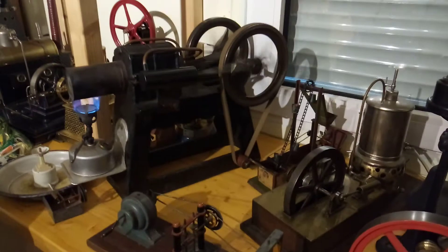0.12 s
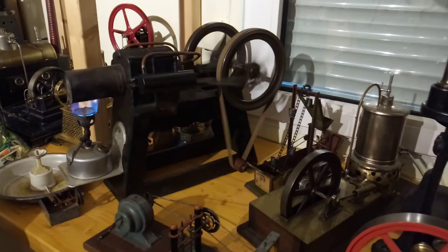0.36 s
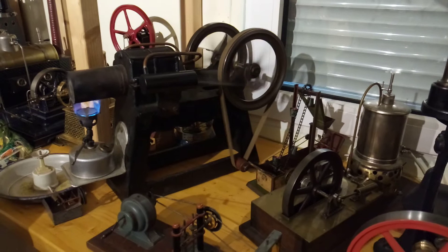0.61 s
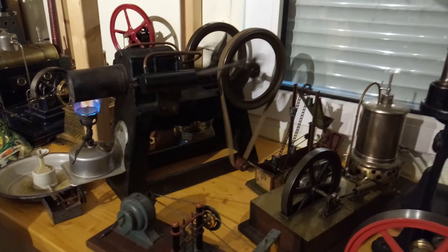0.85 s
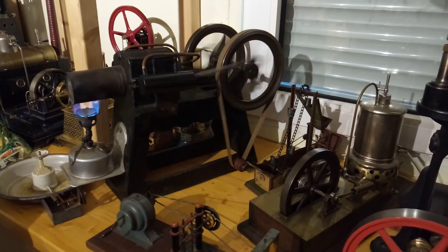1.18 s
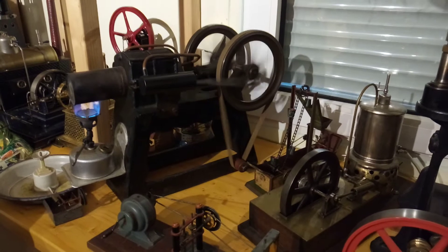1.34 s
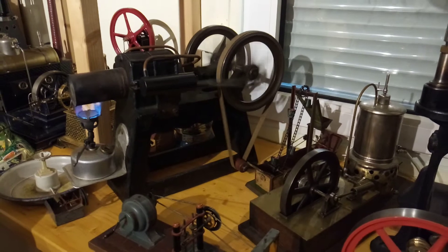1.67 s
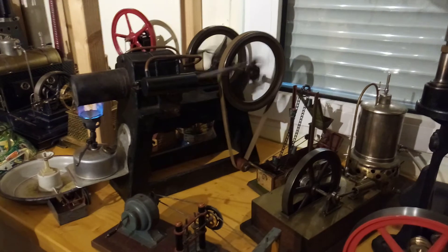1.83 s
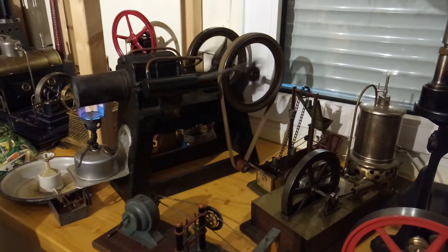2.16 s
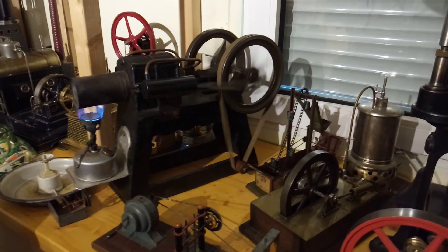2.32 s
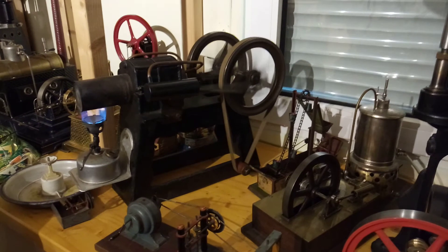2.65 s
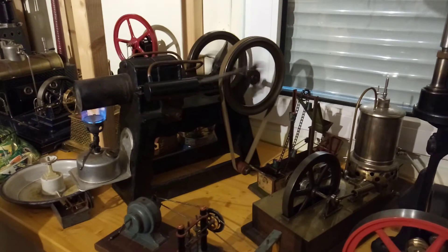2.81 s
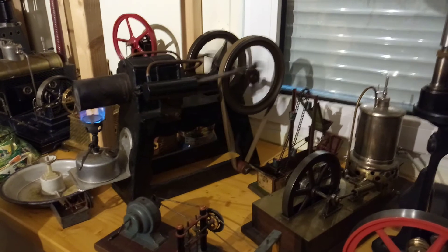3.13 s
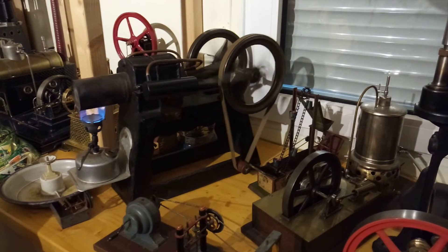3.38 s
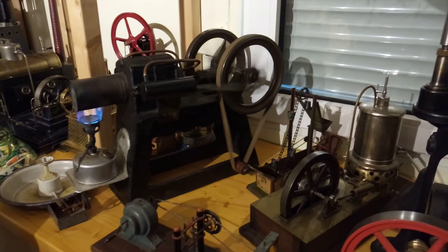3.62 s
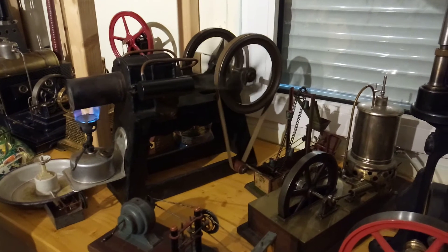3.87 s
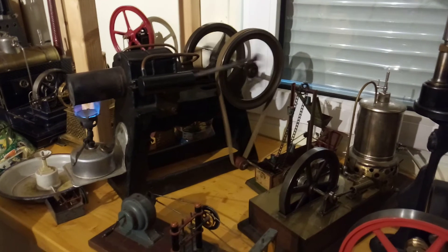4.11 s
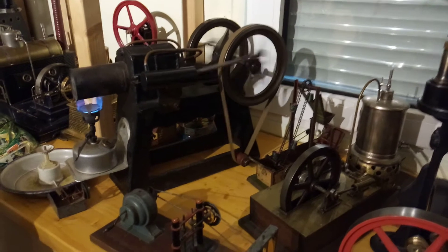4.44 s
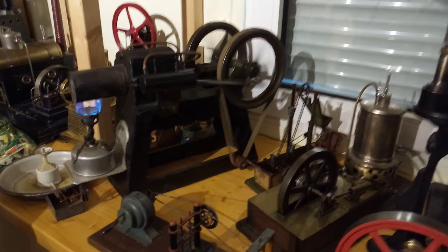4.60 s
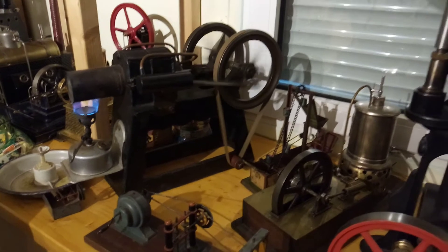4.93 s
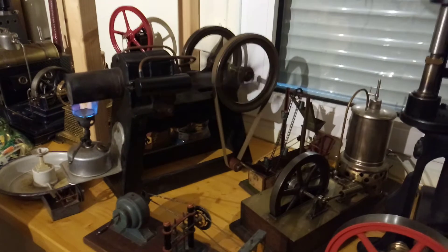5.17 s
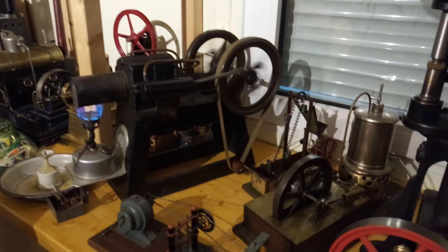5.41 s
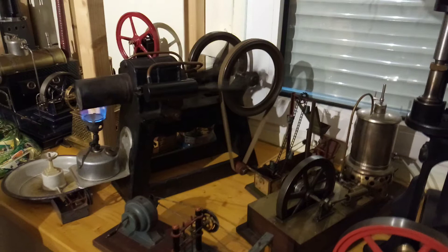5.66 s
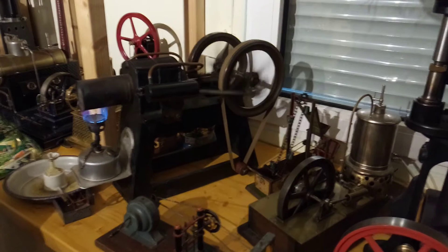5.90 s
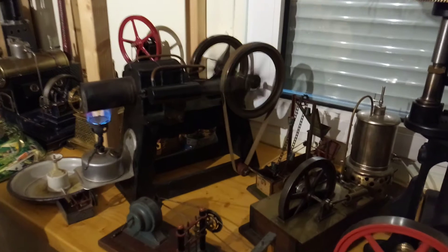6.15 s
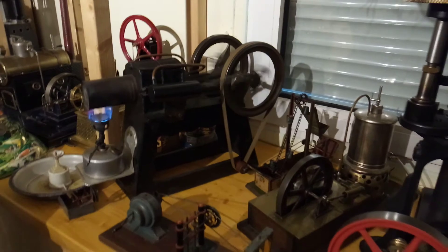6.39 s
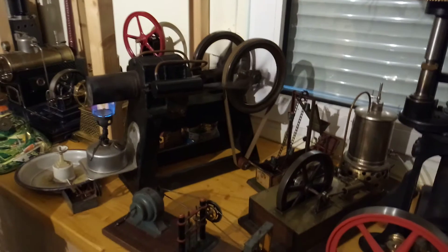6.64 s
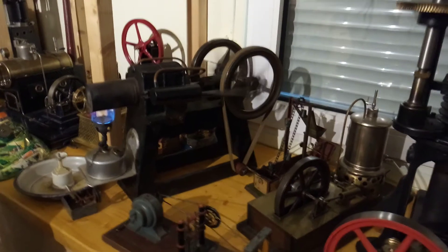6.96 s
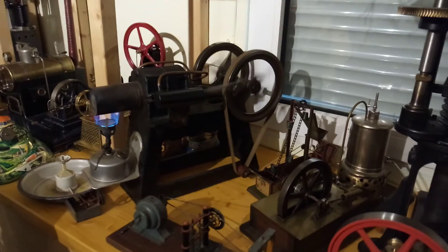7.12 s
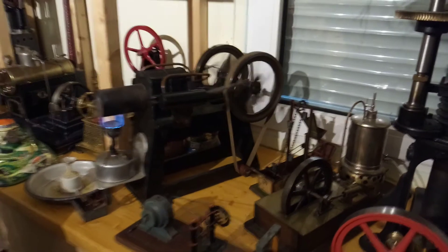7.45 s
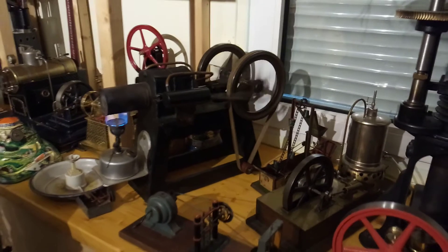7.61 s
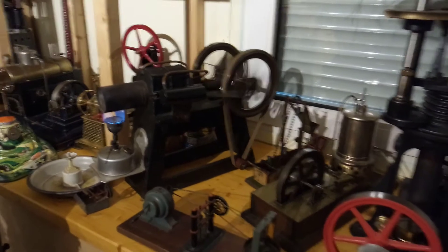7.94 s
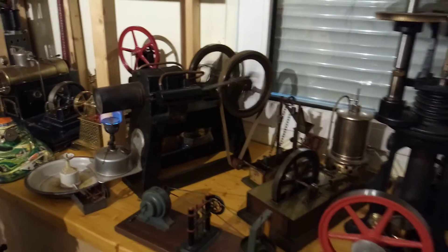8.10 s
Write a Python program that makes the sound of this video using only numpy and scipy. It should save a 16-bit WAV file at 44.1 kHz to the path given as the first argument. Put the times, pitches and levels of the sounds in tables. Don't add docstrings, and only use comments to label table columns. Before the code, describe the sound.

Steady mechanical clinking from an old flame-heated engine, already running and never stopping. High metallic strikes alternate with a looser cluster of knock, ping, tick and rattle, varying from turn to turn, with faint low thumps through floor and bench. A soft, fluttering burner roar fills the gaps. Near, bright microphone indoors, short room echo; late on there is a double slip, a dull handling tap, then the clink softens slightly.

```python
import sys
import numpy as np
from scipy import signal
from scipy.fft import rfft, irfft
from scipy.io import wavfile

SR = 44100
rng = np.random.default_rng(int(sys.argv[2]) if len(sys.argv) > 2 else 0)


def int16_out(signal):
    q = np.round(np.clip(np.atleast_2d(signal).T, -1, 1) * 32767)
    wavfile.write(sys.argv[1], SR, q.astype(np.int16))


def voltage_ratio(decibels):
    exponent = np.asarray(decibels, float) / 20
    return 10 ** exponent


N = 364707
LEAD = SR // 2

# start_s, return_knock_db, tick_db
TURNS = [(0.0563, -32.5, -26), (0.3802, -34, -23), (0.7051, -28.5, -21.5), (1.0287, -39.5, -23),
         (1.3535, -33.5, -26), (1.6793, -30.5, -25), (2.005, -33.5, -23), (2.3319, -29.5, -24),
         (2.6591, -28.5, -24.5), (2.9867, -24, -29), (3.315, -28, -25), (3.6434, -38.5, -26),
         (3.9723, -29, -27), (4.301, -39, -23), (4.6318, -29, -19.5), (4.9627, -21, -32.5),
         (5.2946, -23, -22.5), (5.6262, -24.5, -20), (5.9592, -21, -24), (6.2916, -24.5, -25.5),
         (6.6246, -24, -30.5), (6.9589, -19.5, -28.5), (7.293, -33.5, -23.5), (7.6266, -29.5, -29.5),
         (7.9607, -25, -28)]

# frequency_hz, density_db (per Hz)
FLAME = [(30, -41), (60, -28), (100, -15.5), (160, -4), (247, -1.5), (491, -4), (975, -3), (1530, -7),
         (1900, -4), (3030, -10), (6020, -16.5), (7000, -21.5), (8000, -41), (12500, -50)]
# frequency_hz, width_hz, level_db
BURNER = [(362, 25, -4), (1000, 40, -3), (1125, 40, -4), (875, 40, -7), (5604, 14, -3), (715, 40, -8)]

# frequency_hz, level_db, t60_s, build_up_ms
ROD = [(3486, -1.5, .05, .5), (3454, -13, .3, .5), (3475, -5, .13, .5), (3553, -13, .07, .5),
       (3408, -17, .12, .5), (3341, -12, .04, .5)]
BEAM_PAIRS = [(2048, 1, .21, 9), (2062, -5.5, .3, 9), (2021, -3, .13, .6), (1888, -4.5, .42, 18),
              (1875, -7.5, .3, 18)]
FLOORBOARD = [(71, 1, .21, 14), (56, -8, .17, 14), (82, -8, .14, 14)]
BEAM = [(1829, -9.5, 0.18, .6), (1927, -4, 0.043, 0.88), (2144, -6, 0.096, 0.44), (2354, -2.5, 0.068, 0.63),
        (2473, -8, 0.21, 2.8), (2543, -3.5, 0.086, 0.63), (2685, -12, 0.17, .6), (2717, -1.5, 0.07, 0.53),
        (2890, -6, 0.056, 0.98), (3130, -7.5, 0.082, 0.4), (3606, -6, .1, .6), (3773, -9, .14, .6),
        (3928, -3, .07, .6), (4195, -14, .22, .6), (4660, -22.5, 0.066, .6), (5300, -11.5, 0.04, 0.76),
        (1430, -23.5, 0.054, .6)]
LATCH = [(6200, -4, .03, .5), (5850, -6, .04, .5), (4400, -5, .04, .5), (12670, -38, .03, .8),
         (14700, -42, .03, .8)]
BENCH = [(245, 0, .16, 3), (292, -5, .1, 3), (362, -7, .14, 3), (432, -11, .1, 3), (175, -11, .1, 5),
         (600, -11, .1, 2.5), (760, -12, .1, 2.5)]
CRANK = [(1824, -1.5, .09, .4), (2007, -6, .07, .4), (2142, -8, .06, .4), (3472, -3, .08, .4),
         (3919, -11, .06, .4), (1448, -12, .07, .6), (893, -17, .12, .8), (2551, -12, .06, .4),
         (5604, -19, .15, 1.5), (8963, -33, .04, .4), (14700, -42, .04, .4)]
LEVER = [(2366, -2.5, 0.04, 2.5), (2435, -7, 0.098, 8.3), (2786, -13.5, 0.06, 0.51),
         (1310, -14.5, 0.065, 5.5)]
PIN = [(3960, -11, 0.15, .4), (3570, -5.5, 0.055, .4), (4210, -3.5, 0.03, .4), (6800, -22, 0.03, .4)]

# turn_share (0 to 1), level_db
THUMPS = [
    (0.1, -41),
    (.575, -40),
    (.735, -45),
    (0.27, -52),
]
# turn_share (0 to 1), level_db (over its column), part (modes),
# column (index in crank_turns() rows; None = always alike)
CONTACTS = [
    (0.048, -34, LATCH, None),
    (0.058, -40.5, BENCH, None),
    (.502, 2, CRANK, 2),
    (.578, -3, PIN, 4),
    (.505, -32.5, BENCH, None),
    (.56, -34.5, BENCH, None),
    (.64, -35, BENCH, None),
    (.7, -42, BENCH, None),
    (.15, -44, BENCH, None),
]
# start_s, level_db
STRAY = [
    (6.021, -29),
    (6.027, -28.5),
    (0.87, -40),
    (2.1, -40),
]
# frequency_hz, density_db (per Hz)
RATTLE = [(180, -35.5), (300, -6), (978, -5), (1300, -3), (1580, -2), (2440, -9), (2700, -4), (3890, -3),
          (5610, -5), (7200, -14.5), (7820, -20), (8940, -36), (16000, -45)]
# frequency_hz, width_hz, level_db
LOOSE = [(1280, 120, -5), (2535, 110, -1), (3060, 520, -8.5), (3330, 250, -5), (3870, 88, -0.5),
         (4860, 190, -8), (5500, 25, -12), (6110, 230, -4.5), (895, 82, -2.5), (6890, 170, -8),
         (408, 39, -8)]
# frequency_hz, width_hz, level_db
CAPSULE = [(9020, 1040, 9), (12200, 1100, -4.5)]


def at_hz(points, hz):
    corner_hz, corner_db = np.array(points)[:, 0], np.array(points)[:, 1]
    return np.interp(np.log(hz + 1), np.log(corner_hz), corner_db)


def rms_one(x):
    return x / np.sqrt(np.mean(x ** 2) + 1e-20)


def colour(x, spectrum, peaks):
    hz = np.fft.rfftfreq(8192, 1 / SR)
    lift = 1 + sum(voltage_ratio(db + 9.5) ** 2 / (1 + (2 * (hz - at) / width) ** 2) for at, width, db in peaks)
    cepstrum = irfft(np.log(voltage_ratio(at_hz(spectrum, hz)) * np.sqrt(lift)))
    cepstrum[1:4096] *= 2
    cepstrum[4097:] = 0
    response = rms_one(irfft(np.exp(rfft(cepstrum)))) / np.sqrt(8192)
    return signal.oaconvolve(x, response)[:len(x)]


def clicks(times_s, gains):
    train = np.zeros(N + LEAD)
    at = (np.asarray(times_s) * SR + LEAD).astype(int)
    inside = at < N + LEAD
    np.add.at(train, at[inside], np.asarray(gains)[inside])
    return train


def strike(modes, times_s, level_db, uneven):
    t = np.arange(SR // 2) / SR
    hz, db, t60_s, rise_ms = np.transpose(modes)[:, :, None]
    envelope = voltage_ratio(db - 60 * t / t60_s) * (1 - np.exp(-1000 * t / rise_ms))
    rings = envelope * np.sin(2 * np.pi * hz * t)
    same = (-1) ** np.arange(len(modes))
    blows = (same + uneven * rng.standard_normal((len(times_s), len(modes)))) @ rings
    out = np.zeros(N + LEAD + SR)
    starts = (np.asarray(times_s) * SR + LEAD).astype(int)
    for at, gain, blow in zip(starts, voltage_ratio(level_db), blows):
        out[at:at + len(blow)] += gain * blow
    return out[:N + LEAD]


def slower_ms(length_s):
    return 1000 * length_s - 328.4


def crank_turns():
    rows = np.array([TURNS[0]] + TURNS)
    rows[0, 0] = 2 * rows[1, 0] - rows[2, 0]
    start_s, knock_db, tick_db = rows.T
    length_s = np.diff(start_s)
    length_s = np.append(length_s, length_s[-1])
    clink_db = -16 - 0.06 * slower_ms(length_s)
    ping_db = -21.3 + 0.13 * (knock_db + 28)
    rattle_db = -25.5 - 0.68 * (tick_db + 25)
    return np.transpose([start_s, clink_db, knock_db, ping_db, tick_db, rattle_db]), length_s


def flame():
    t = np.arange(N) / SR
    flutter = np.interp(t * 25, np.arange(N // 1000), rng.standard_normal(N // 1000))
    roar = colour(rng.standard_normal(N + LEAD), FLAME, BURNER)[LEAD:]
    rows, length_s = crank_turns()
    turn_edges_s = np.append(rows[:, 0], rows[-1, 0] + length_s[-1])
    crank = np.interp(t, turn_edges_s, np.arange(len(rows) + 1))
    draught_db = 0.5 * np.cos(2 * np.pi * (crank - 1))
    return roar * voltage_ratio(-42 + draught_db + 2.24 * flutter)


def rod_clink():
    rows, _ = crank_turns()
    hidden_db = 7 * np.clip(rows[:, 0] - 7.16, 0, None)
    return strike(ROD, rows[:, 0] + 0.00055, rows[:, 1] + 2.2 - hidden_db, uneven=0.045)


def beam_beating():
    rows, length_s = crank_turns()
    at_centre = rows[:, 0] + .0008
    beam_db = rng.normal(-27, .7, len(rows))
    out = strike(BEAM_PAIRS[:3], at_centre, beam_db, uneven=.2)
    low_db = 1.0 + beam_db - .5 * slower_ms(length_s)
    return out + strike(BEAM_PAIRS[3:], at_centre, low_db, uneven=.15)


def beam_ring():
    rows, _ = crank_turns()
    return strike(BEAM, rows[:, 0] + .0008, rng.normal(-26, 0.62, len(rows)), uneven=0.22)


def linkage_contacts():
    rows, length_s = crank_turns()
    out = np.zeros(N + LEAD)
    for share, db, part, column in CONTACTS:
        level_db = db + (rows[:, column] if column else rng.normal(0, .8, len(rows)))
        out += strike(part, rows[:, 0] + share * length_s, level_db, uneven=0.23)
    return out


def piston_thumps():
    rows, length_s = crank_turns()
    out = np.zeros(N + LEAD)
    for share, db in THUMPS:
        level_db = db + rng.normal(0, .8, len(rows))
        out += strike(FLOORBOARD, rows[:, 0] + share * length_s, level_db, uneven=0.22)
    return out


def lever_ping():
    rows, length_s = crank_turns()
    held = .0011 * np.clip(rows[:, 2] + 34, 0, 12)
    return strike(LEVER, rows[:, 0] + (.541 + held) * length_s, rows[:, 3] + 4, uneven=0.16)


def rattle():
    rows, length_s = crank_turns()
    start_s, clink_db, knock_db, _, tick_db, rattle_db = rows.T
    stray_s, stray_db = np.transpose(STRAY)
    t = np.arange(SR // 4) / SR
    burst = np.clip(t / 0.0021, 0, 1)
    shape = burst * voltage_ratio(-60 * np.clip(t - 0.0064, 0, None) / 0.077)

    trail = clicks(start_s + 0.0056 * length_s, voltage_ratio(clink_db - 18))
    trail += clicks(start_s + 0.041 * length_s, voltage_ratio(clink_db - 15.5))
    starts = clicks(start_s + .503 * length_s, voltage_ratio(knock_db - 6.5))
    starts += clicks(start_s + 0.573 * length_s, voltage_ratio(tick_db - 4))
    starts += clicks(start_s + .603 * length_s, voltage_ratio(rattle_db - 2.5))
    starts += clicks(stray_s, voltage_ratio(stray_db - 9.5))

    touches_per_s = 5000
    touches = (rng.random(N + LEAD) < touches_per_s / SR) * rng.standard_normal(N + LEAD)
    touches = colour(rms_one(touches), RATTLE, LOOSE)
    light = signal.sosfilt(signal.butter(2, 1500, "high", fs=SR, output="sos"), touches)
    full_runs = signal.oaconvolve(starts, shape)[:N + LEAD] * touches
    return full_runs + signal.oaconvolve(trail, shape)[:N + LEAD] * light


def stray_slips():
    stray_s, stray_db = np.transpose(STRAY)
    return strike(CRANK + PIN + BENCH[2:4], stray_s, stray_db - 3.5, uneven=.5)


def workshop(x):
    t = np.arange(SR // 2) / SR
    echoes = rng.standard_normal(len(t)) * voltage_ratio(-60 * t / 0.29) * (t > .004)
    echoes = signal.sosfilt(signal.butter(1, 13900, fs=SR, output="sos"), echoes)
    return x + voltage_ratio(-8.5) * signal.oaconvolve(x, echoes / np.linalg.norm(echoes))[:len(x)]


def housing_bump():
    start_s, level_db, pitch_hz = 6.5922, -17.5, 310
    t = np.clip(np.arange(N) / SR - start_s, 0, None)
    phase = 2 * np.pi * pitch_hz * t / (1 + 130 * t) + .7 * (t > 0)
    pulse = -voltage_ratio(level_db - 60 * t / .02) * np.sin(phase)
    return signal.sosfilt(signal.butter(2, 900, fs=SR, output="sos"), pulse)


def scene():
    near = rod_clink() + beam_beating() + piston_thumps()
    in_room = beam_ring() + linkage_contacts() + lever_ping() + rattle() + stray_slips()
    engine = (workshop(in_room) + near)[LEAD:]
    return (flame() + engine + housing_bump())[None]


def low_pass(x):
    return signal.sosfilt(signal.butter(12, 16670, fs=SR, output="sos"), x)


def record(dry):
    aim = np.interp(np.arange(N) / SR, [4.4, 5.4], [0, 1])
    treble = dry.copy()
    for hz, width_hz, db in CAPSULE:
        treble = treble + voltage_ratio(db) * signal.lfilter(*signal.iirpeak(hz, hz / width_hz, SR), dry)
    treble = signal.sosfilt(signal.butter(4, 7500, "high", fs=SR, output="sos"), treble)
    port = signal.lfilter(*signal.iirpeak(15300, 13, SR), dry + treble)
    mix = dry + treble * voltage_ratio(1.06 + 0.3 * aim) + port * voltage_ratio(10.5 + 5 * aim)
    mix = signal.sosfilt(signal.butter(2, 40, "high", fs=SR, output="sos"), mix)
    mix = signal.sosfilt(signal.cheby2(14, 60, 16700, fs=SR, output="sos"), mix)
    return low_pass(mix)


dry = scene()
out = record(dry)
int16_out(out)
```